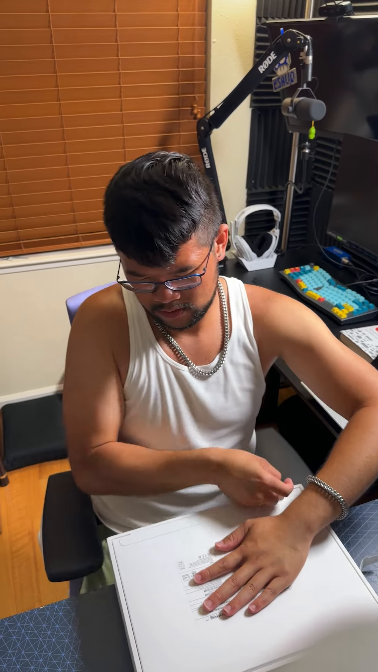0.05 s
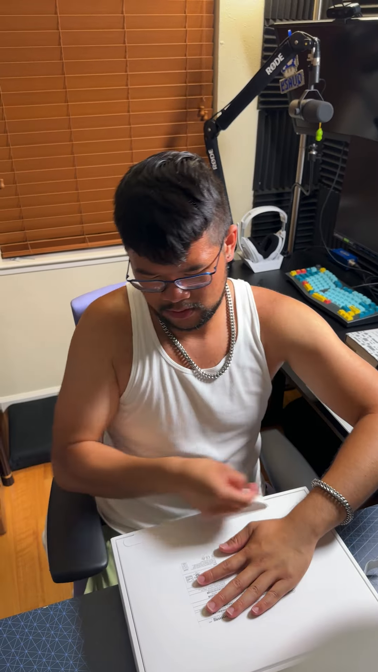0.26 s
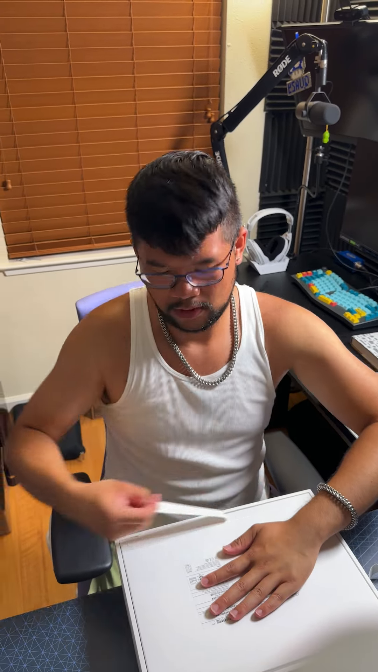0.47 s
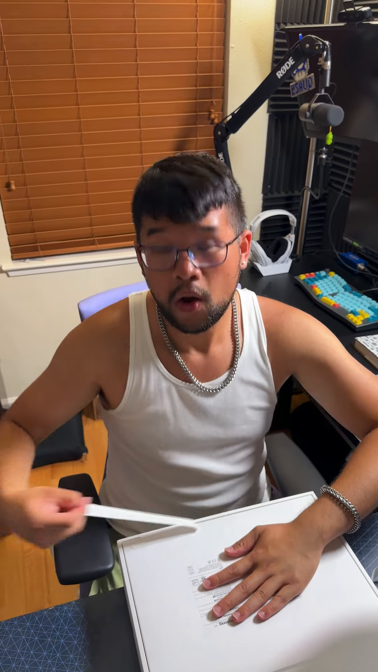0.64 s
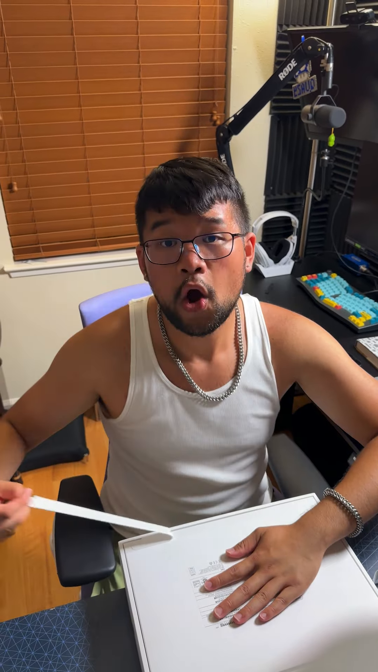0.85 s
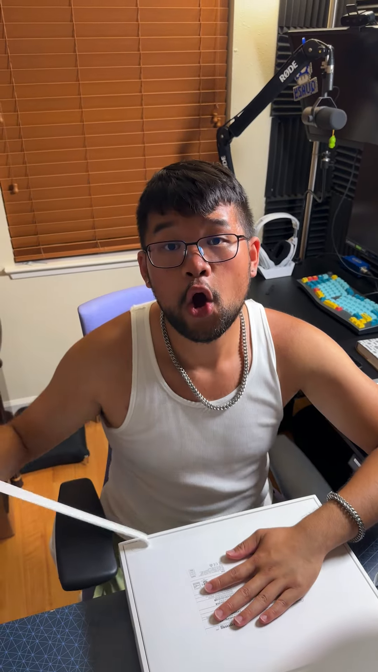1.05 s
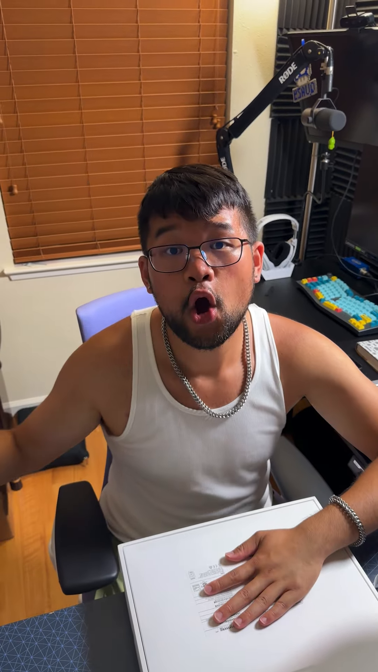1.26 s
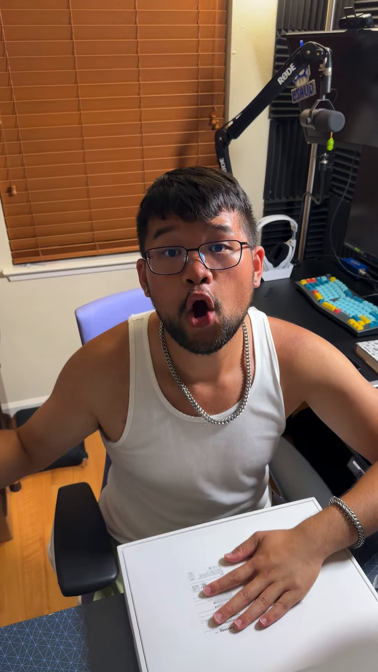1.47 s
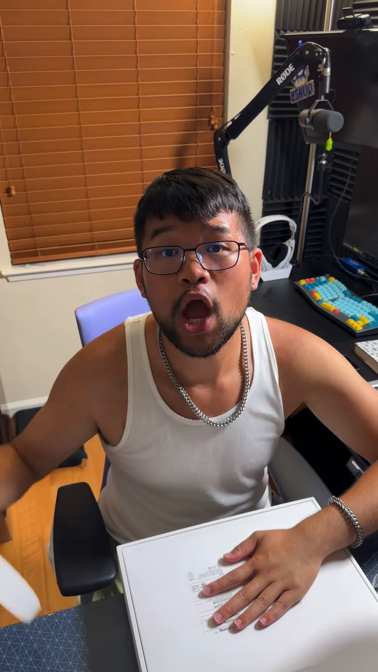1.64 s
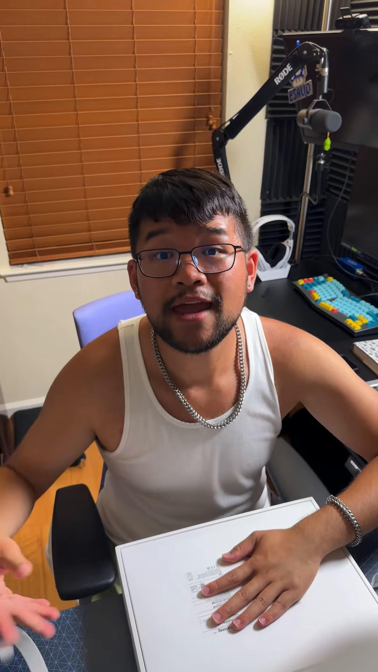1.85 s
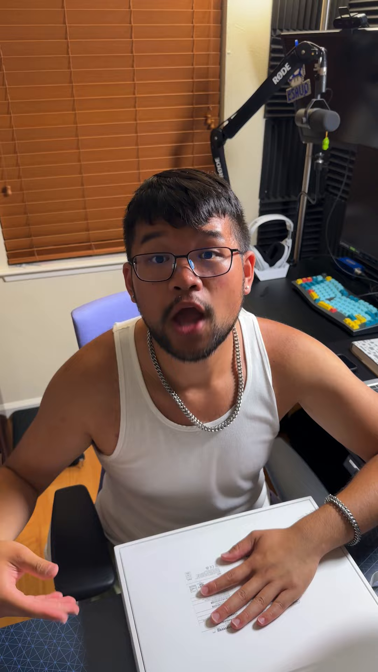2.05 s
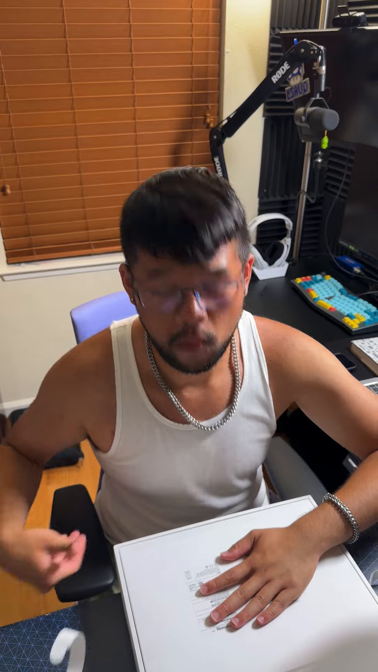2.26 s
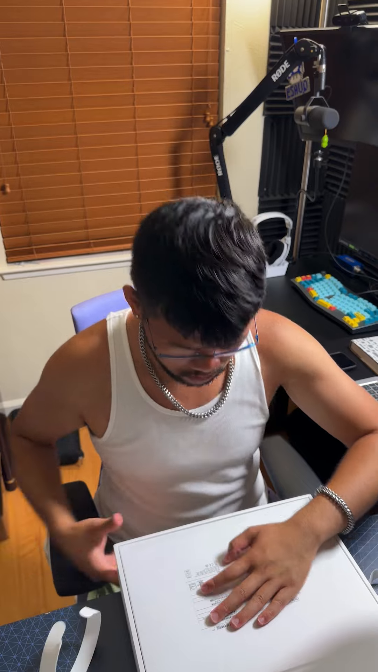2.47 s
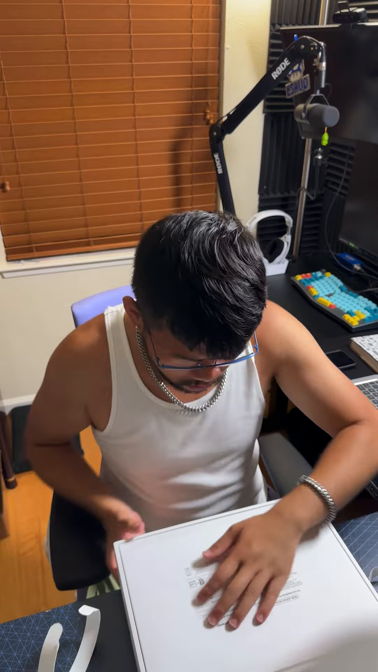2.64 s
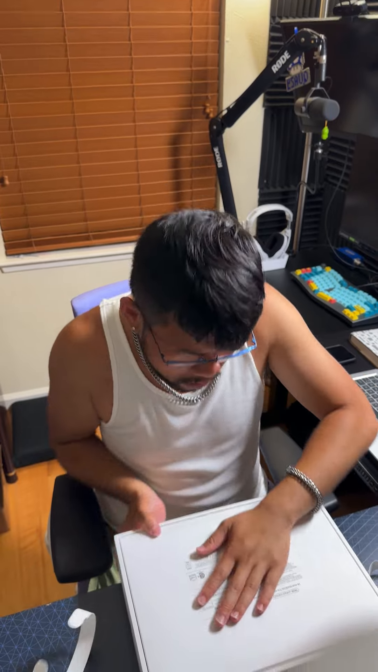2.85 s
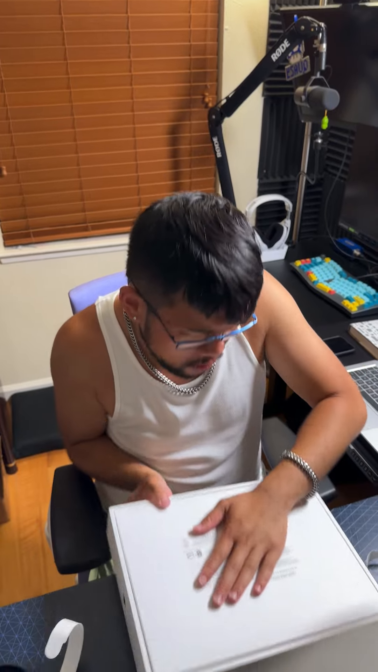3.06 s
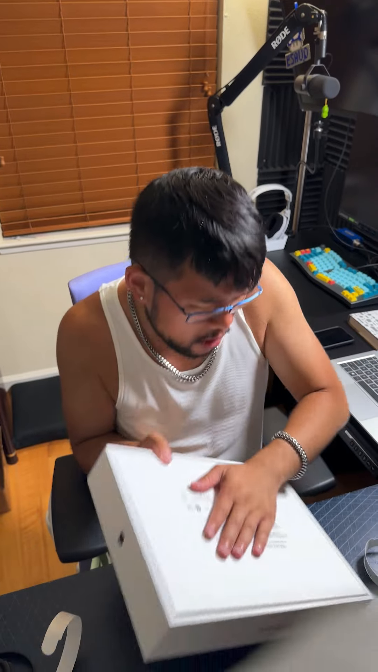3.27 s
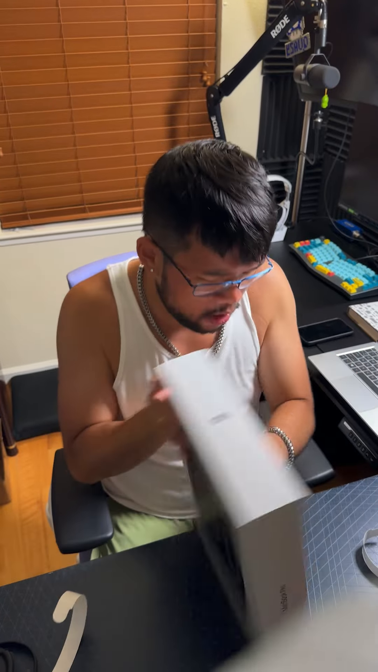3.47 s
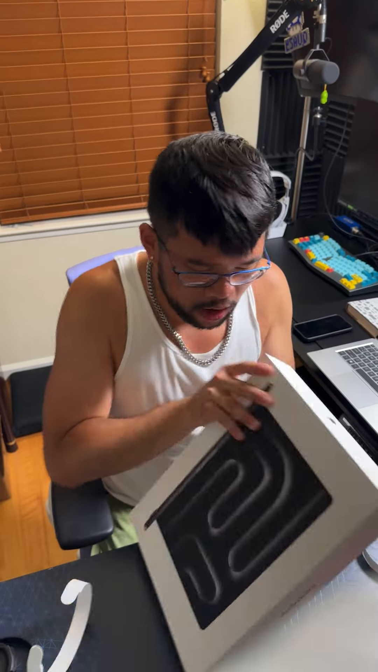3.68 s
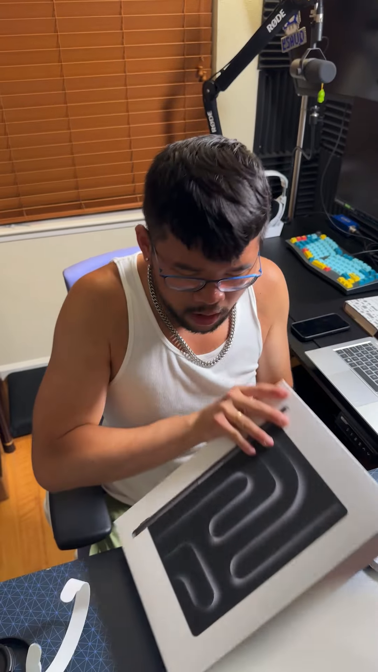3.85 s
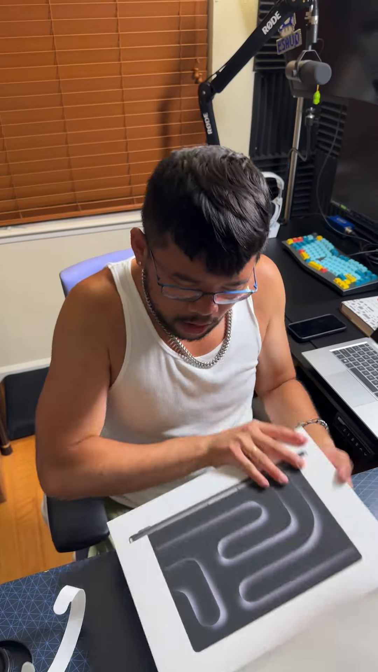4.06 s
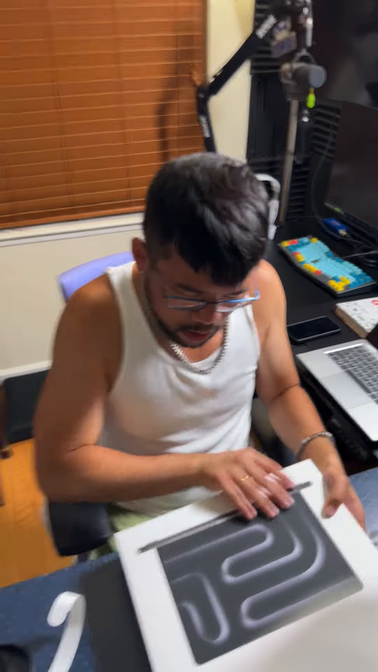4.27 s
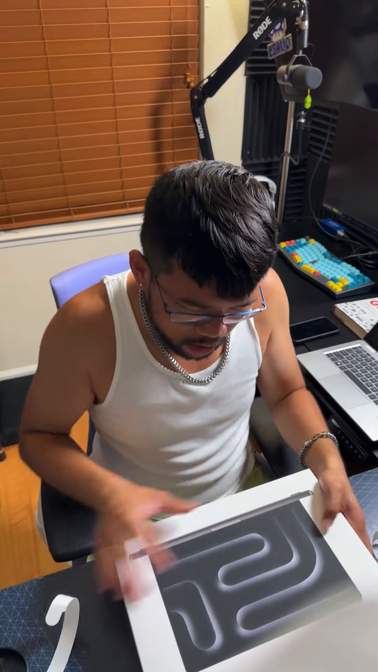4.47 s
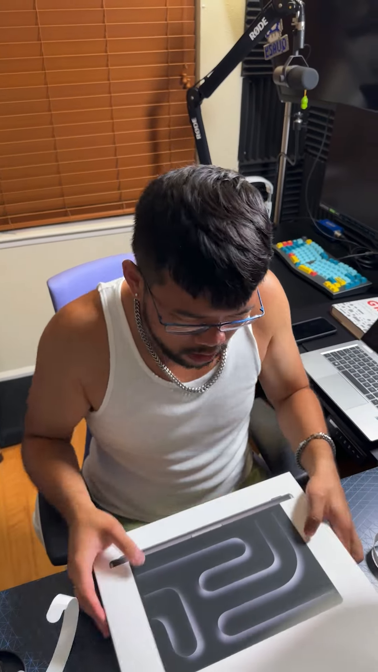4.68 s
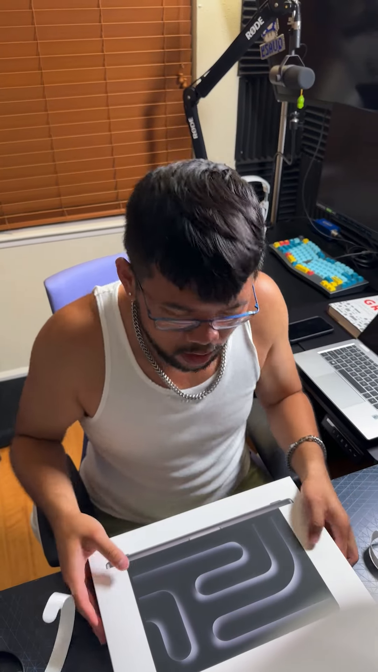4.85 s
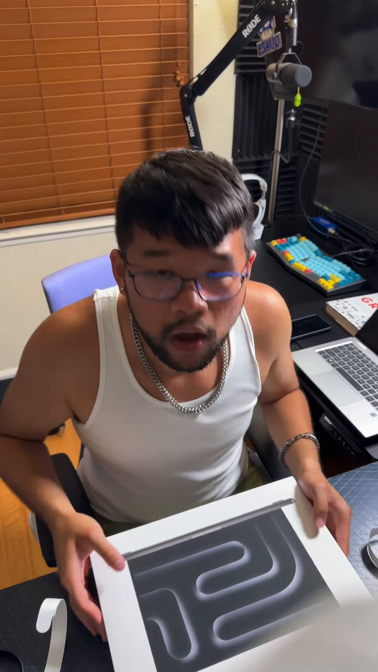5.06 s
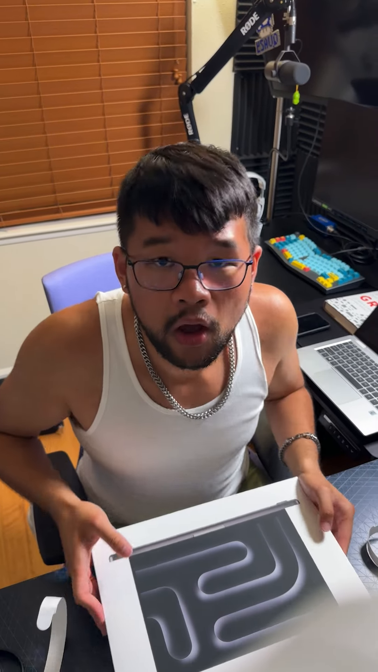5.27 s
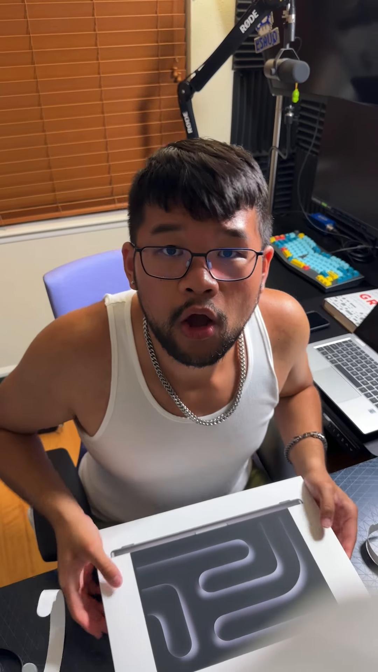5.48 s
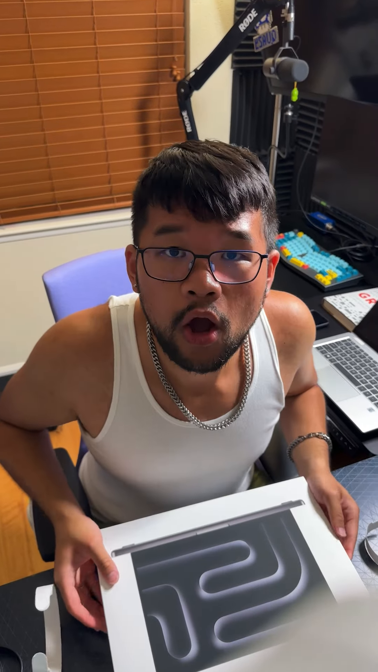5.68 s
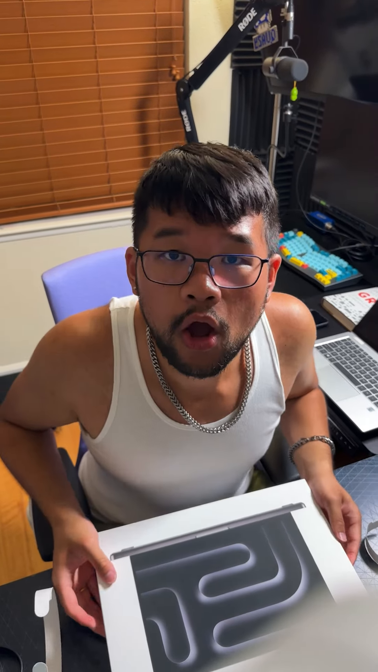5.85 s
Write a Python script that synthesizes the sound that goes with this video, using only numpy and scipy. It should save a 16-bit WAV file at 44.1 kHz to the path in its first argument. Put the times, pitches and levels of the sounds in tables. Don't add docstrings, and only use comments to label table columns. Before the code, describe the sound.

A small, damped room with a steady, faint computer fan, heard close in narrow stereo. From 0 to 1.1 s a paper strip is torn along a cardboard box: dense, dry fibre crackle with small snaps, swelling to about 0.6 s, easing, while the hollow lid drums faintly beneath. At 1.13 s the strip cracks free, sharp and bright, with a short flutter and light thump. Quiet follows, with two crisp crinkles near 1.8 s and skin brushes and nail ticks around 2.5 s. At 3.14 s the box is lifted with a soft knock, scraping through the hands by 3.45 s. Its edge stutters on the desk at 3.57 s with a deep boom; another low thud follows at 3.72 s. At 4.27 s it lands flat, the loudest hollow slap and boom, then settles at 4.63 s. Faint finger brushing, ticks and a soft knock at 5.4 s finish.

```python
import sys
import numpy as np
from scipy import signal
from scipy.fft import rfft, irfft, next_fast_len
from scipy.io import wavfile
from scipy.ndimage import uniform_filter1d, map_coordinates

SR = 44100
rng = np.random.default_rng(int(sys.argv[2]) if len(sys.argv) > 2 else 0)


def store_pcm(level_fs):
    pcm = np.round(np.clip(level_fs, -1, 1) * 32767).astype(np.int16)
    wavfile.write(sys.argv[1], SR, np.atleast_2d(pcm).T)


def volts(x):
    e = np.asarray(x, float) / 20
    return 10 ** e


N = 260975
# t/s, pull level/dB, level of hand pressing on lid/dB, strip resonance f/Hz
PULL = [(0.0, -65, -78, 4240), (0.11, -55, -48, 4350), (0.25, -43, -41.5, 4000), (0.47, -40.5, -47, 3400),
        (0.56, -40, -48, 3700), (0.66, -41.5, -52.5, 5200), (0.76, -46, -56, 3700),
        (0.83, -47.5, -58, 4800), (0.92, -46, -54.5, 4700), (0.97, -47, -48, 3500),
        (1.113, -49, -53.5, 3500)]
# f/Hz, width/Hz, level/dB
DESK_MODES = [(48.34, 7.7, -0.5), (69, 39, -6), (82.1, 13, -3.5)]
# f/Hz, width/Hz, level/dB
BOX_MODES = [(147, 75, -6.5), (205, 43, -4), (240, 16, -0.5), (348.8, 41, -2.5), (491, 90, -10),
             (594, 112, -9.5), (750, 33, -10.5), (914, 53, -14.5)]
REST_DB = np.array([-90, -70])


def unit(x):
    return x / np.sqrt(np.mean(x ** 2) + 1e-20)


def along(points, hz):
    f, v = np.transpose(points)
    return np.interp(np.log(hz + 1), np.log(f + 1), v)


def gains(rows, size=130):
    s, *cols = np.transpose(rows)
    levels = [volts(np.interp(np.arange(N) / SR, s, c, left=-120, right=-120)) for c in cols]
    return uniform_filter1d(levels, size, axis=1)


def filtered(x, response):
    m = next_fast_len(N + SR // 2)
    return irfft(rfft(x, m) * response(np.fft.rfftfreq(m, 1 / SR)), m)[..., :N]


def coloured(x, spectrum):
    return unit(filtered(x, lambda hz: volts(along(spectrum, hz))))


def resonant(x, modes):
    def response(f):
        total = 0
        for k, (centre, width, db) in enumerate(modes):
            damping = 1j * f * width
            total = total + (-1) ** k * volts(db) * damping / (centre ** 2 - f ** 2 + damping)
        return total
    return unit(filtered(x, response))


def add(track, s, sound):
    track[round(s * SR):][:len(sound)] += sound[:N - round(s * SR)]


def grit(rate_hz, depth_db, patchy_db):
    z = signal.stft(rng.standard_normal(N), nperseg=256)[2]
    field = uniform_filter1d(uniform_filter1d(rng.standard_normal(z.shape), 5, 0), 10, 1)
    noise = signal.istft(z * volts(patchy_db * unit(field)), nperseg=256)[1][:N]
    knots = rng.standard_normal(N // 20)
    return noise * volts(depth_db * map_coordinates(knots, [np.arange(N) * rate_hz / SR]))


def crackle(rate_hz, spread_db, t60_s, patchy_db):
    sizes = volts(spread_db * np.minimum(rng.exponential(size=N), 3))
    starts = (rng.random(N) < rate_hz / SR) * sizes
    burst = volts(-60 * np.arange(SR // 20) / SR / t60_s)
    return grit(100, 0, patchy_db) * (1 + signal.fftconvolve(starts, burst)[:N])


def fan():
    # f/Hz, level/dB per Hz
    fan_spectrum = [(20, -12), (45, 2.5), (90, 1.5), (200, -2.5), (400, -11), (750, -8), (1100, -10),
                    (1600, -22.5), (2500, -33), (4500, -31.5), (6200, -31.5), (8000, -48), (12500, -71),
                    (13200, -89.5)]
    return volts(-52) * coloured(grit(7.2, depth_db=0.5, patchy_db=1.0), fan_spectrum)


def room(x):
    # f/Hz, t60/s
    decay = [(150, 0.97), (500, 0.21), (1500, 0.24), (4000, 0.24), (10000, 0.24)]
    hz, t, z = signal.stft(rng.standard_normal(SR // 2), SR, nperseg=256)
    z = z * volts(-60 * t / along(decay, hz)[:, None]) * (hz > 200)[:, None]
    tail = signal.istft(z, SR, nperseg=256)[1]
    return signal.fftconvolve(np.pad(x, (260, 0)), tail / np.linalg.norm(tail))[:N]


def desk():
    # t/s, boom level/dB, upper mode level/dB, t60/s, time until damped/s
    booms = [
        (1.128, -37.5, 1.5, 0.27, 0.19),
        (3.148, -31, 1, 0.27, 0.16),
        (3.455, -23.5, 2.5, 0.26, 0.027),
        (3.571, -12.5, -8, 0.39, 0.093),
        (3.718, -14, -7.5, 0.37, .3),
        (4.271, -10, -3.5, 0.39, .095),
        (4.407, -28.5, -12, .6, 0.12),
        (4.629, -19, -19, 0.23, 0.19),
    ]
    rise_s = 0.0081
    out, t = np.zeros(N), np.arange(SR // 2) / SR
    low, middle, upper = [np.sin(2 * np.pi * hz * t) for hz, *_ in DESK_MODES]
    for s, db, upper_db, t60_s, held_s in booms:
        swing = low + volts(upper_db) * upper
        swing = swing + volts(-2.0 - 60 * t / 0.074) * middle
        damping_db = -60 * t / t60_s - 600 * np.maximum(t - held_s, 0)
        add(out, s, swing * volts(db + damping_db) * (1 - np.exp(-t / rise_s)))
    return out


def knocks():
    # t/s, knock level/dB, struck panel f/Hz, t60/s
    knock_rows = [(1.129, -27, 198, 0.097), (3.137, -21.5, 330, 0.16), (3.559, -19, 336, 0.065),
                  (3.574, -28.5, 205, 0.55), (3.713, -26.5, 376, 0.073), (3.72, -30, 205, 0.2),
                  (3.954, -31.5, 198.4, 0.2), (4.2635, -14, 420, 0.06), (4.2738, -13, 204, 0.093),
                  (4.285, -22.5, 147, 0.4), (4.289, -29, 354, 0.13), (4.622, -36, 397, 0.097),
                  (4.643, -26.5, 266, 0.13), (4.715, -36, 1190, 0.04), (5.8, -50, 270, .15),
                  (5.408, -36.5, 260, 0.11), (3.412, -30.5, 356, 0.42), (3.465, -24.5, 341, 0.13),
                  (4.266, -20.5, 581, 0.099), (4.269, -22.5, 770, 0.095), (4.264, -25, 1250, .04),
                  (4.264, -27, 2200, 0.073), (4.324, -25.5, 240, .06), (3.46, -32, 1470, .06),
                  (3.447, -33, 1860, 0.067), (2, -46, 700, .03), (2, -50, 550, .03), (2.552, -42, 500, .04),
                  (5.415, -42, 400, .08), (3.385, -38, 850, 0.088)]
    out, t = np.zeros(N), np.arange(SR // 2) / SR
    rise = 1 - np.exp(-t / .003)
    for s, db, panel_hz, t60_s in knock_rows:
        others = 0
        for (hz, *_), (a, b) in zip(BOX_MODES, rng.standard_normal((len(BOX_MODES), 2))):
            mode = np.sin(2 * np.pi * hz * (1 + 0.037 * b) * t)
            others = others + volts(a - 9.5 - t * hz * 1.6) * mode
        wander = rng.standard_normal((2, 60))
        rock_db, rock_turn = [map_coordinates(k, [t * 90]) * np.minimum(t / .02, 1) for k in wander]
        panel = volts(3 * rock_db) * np.sin(2 * np.pi * panel_hz * t + 1.2 * rock_turn)
        add(out, s, (panel + others) * volts(db - 60 * t / t60_s) * rise)
    return out


def slaps():
    # t/s, slap level/dB, t60/s
    slap_rows = [(1.128, -30.5, 0.11), (3.137, -28, 0.033), (3.559, -41, 0.1), (3.574, -38, 0.063),
                 (3.711, -38, 0.04), (3.72, -47, 0.081), (3.955, -49, 0.056), (4.263, -13, 0.07),
                 (4.278, -26, .06), (4.274, -19, 0.22), (4.62, -42, 0.068), (4.644, -38, 0.14),
                 (5.227, -60, .1), (5.405, -43, 0.087)]
    # f/Hz, level/dB per Hz
    slap_spectrum = [(200, -1), (450, 1), (1000, -7), (1700, -13), (2700, -21.5), (3600, -35), (6000, -37),
                     (16000, -43.5)]
    # t/s, level/dB, half length/s
    push = (4.2774, -4, .0009)
    gain, air, t = np.zeros(N), np.zeros(N), np.arange(SR // 2) / SR
    for s, db, t60_s in slap_rows:
        add(gain, s, volts(db - 60 * t / t60_s) * (1 - np.exp(-t / 0.00054)))
    push_s, push_db, half_s = push
    add(air, push_s - .005, -volts(push_db) * np.exp(-((t - .005) / half_s) ** 2))
    return air + gain * coloured(grit(300, depth_db=1.5, patchy_db=.8), slap_spectrum)


def strokes(rows):
    scrape_steeper = 1.26
    t, power = np.arange(N // 16 + 1) * 16 / SR, volts(REST_DB)[:, None] ** 2
    for s, hiss_db, scrape_db, rise_s, fall_s in rows:
        below_db = 20 * np.maximum((s - t) / max(rise_s, .003), (t - s) / max(fall_s, .003))
        power = power + volts([hiss_db - below_db, scrape_db - scrape_steeper * below_db]) ** 2
    return uniform_filter1d(np.repeat(np.sqrt(power), 16, axis=1)[:, :N], 64, axis=1)


def hands():
    # peak t/s, hiss level/dB,
    # scrape level/dB, 20 dB rise/s, 20 dB fall/s
    hand_strokes = [(2.08, -79, -62.5, 0.1, .3), (2.53, -66.5, -54, 0.08, 0.24), (2.55, -63, -52, -0.09, 0.13),
                    (2.71, -59.5, -61, 0.03, 0.12), (2.82, -66, -71, 0.24, -0.2),
                    (2.49, -70, -53.5, -0.01, 0.14), (2.945, -60, -72, .1, .13), (2.46, -66, -62, .08, .1),
                    (2.61, -66, -66, .1, .12), (3.05, -69.5, -63, 0.2, .1), (4.8, -68.5, -61.5, .05, 0.25),
                    (5.286, -68, -61, 0.35, 0.1), (5.42, -65.5, -59.5, .04, 0.15), (5.1, -70, -67, 0.3, 0.3),
                    (4.94, -68, -66, .08, .15), (5.22, -68, -63, .15, .15), (5.52, -71, -68, .1, .15),
                    (5.88, -71, -68, .1, .1), (5.62, -73.5, -67, 0.3, 0.5), (5.78, -67, -64, -0.02, -0.04),
                    (3.14, -60.5, -52.5, 0.1, .5), (3.29, -60.5, -47.5, 0.21, 0.52), (3.39, -57, -48, 0.24, 0.2),
              (3.448, -46, -35, 0.025, 0.15), (3.56, -45, -45, 0, 0.0951), (3.463, -46, -33, .02, 0.04),
              (3.494, -44, -33.5, 0.07, 0.05), (3.515, -52, -41.5, .03, 0.03),
              (3.582, -36, -32, 0.0234, 0.04), (3.728, -65, -40.5, .006, 0), (3.894, -61.5, -51, 0.17, .5),
              (4.034, -57, -63, .03, .03), (4.174, -66, -59, -0.2, .5), (4.261, -46, -33.5, -0.0026, .04),
              (4.29, -58.5, -53.5, 0.7, 0.45), (4.493, -53, -54.5, 0, 0.05), (4.623, -56, -52, 0.04, 0.11),
              (4.65, -51.5, -45, 0.08, 0.17)]
    # peak t/s, rustle level/dB, scrape level/dB, 20 dB rise/s, 20 dB fall/s
    rustles = [
        (1.435, -66, -80, .07, .07),
        (1.53, -72, -80, .04, .05),
        (1.71, -72, -80, .04, .06),
        (1.819, -63, -62, .003, .08),
        (1.858, -60, -63, .004, .11),
        (1.99, -70, -75, .01, .05),
    ]
    # t/s, box drumming level/dB, desk shake level/dB
    weight = [(1.2, -52.5, -57.5), (1.53, -66, -57), (1.83, -55.5, -55), (2.14, -67.5, -63),
              (2.5, -52.5, -52), (2.9, -61, -56.5), (3.12, -52.5, -58.5), (3.17, -44.5, -52),
              (3.32, -45.5, -39), (3.44, -36, -48), (3.56, -45, -42), (3.75, -48, -29), (3.83, -45, -39),
              (3.946, -42.5, -36), (4.1, -51, -47), (4.4, -50.5, -52), (4.55, -53.5, -43.5),
              (5.918, -57.5, -70.5)]
    # f/Hz, level/dB per Hz
    skin_spectrum = [(1500, -28), (3000, -4.5), (5000, -1), (7500, 2), (10000, -5), (13000, -4),
                     (16000, -9)]
    # f/Hz, level/dB per Hz
    scrape_spectrum = [(400, -23), (650, 0), (1100, -1), (1600, 3), (2600, -1), (3500, -8.5), (5000, -15.5),
                       (8000, -40)]
    rustle_top_hz = 8800
    hiss, scrape = strokes(hand_strokes)
    rustle, paper_scrape = strokes(rustles) - volts(REST_DB)[:, None]
    scrape = np.hypot(scrape, paper_scrape)
    skin = volts(3) * coloured(grit(200, depth_db=1.2, patchy_db=.8), skin_spectrum)
    paper = filtered(skin, lambda hz: 1 / (1 + (hz / rustle_top_hz) ** 12))
    board = coloured(crackle(500, spread_db=.5, t60_s=0.01, patchy_db=1), scrape_spectrum)
    drum, shake = gains(weight, size=900)
    box = drum * resonant(grit(50, depth_db=2.0, patchy_db=0), BOX_MODES)
    top = shake * resonant(rng.standard_normal(N), DESK_MODES)
    return hiss * skin + rustle * paper + scrape * board + box + top


def snaps(rows, cycles):
    rise_s, ring_db, rasp_db = .0006, -2, -4
    out, t = np.zeros(N), np.arange(SR // 50) / SR
    shape = t / rise_s * np.exp(1 - t / rise_s)
    for s, db, hz in rows:
        rasp = shape * rng.standard_normal(len(t))
        ring = (1 - np.exp(-t / rise_s)) * np.exp(-t * hz / cycles) * np.sin(2 * np.pi * hz * t)
        add(out, s - .0005, volts(db) * (volts(ring_db) * 2 * ring + volts(rasp_db) * rasp))
    return out


def nail_ticks():
    # t/s, peak level/dB, pitch f/Hz, crack level/dB; the one at 1.1383 s is an early echo of the strip's snap
    nail_rows = [(1.342, -56, 2670, 10), (1.818, -33, 5000, 0), (1.8565, -33, 5300, 0),
                 (1.9894, -61, 2310, -4), (2.0692, -45, 3130, -4.5), (2.489, -43, 3000, 2.5),
                 (2.5283, -39, 3020, 7), (2.5518, -33.5, 3020, 7), (2.6815, -44.5, 1850, 4),
                 (3.1357, -41, 2140, -10), (3.26, -45, 2400, 6), (1.1383, -19.5, 6140, -6),
                 (3.7275, -38, 2400, 0), (4.0345, -40, 2800, 0), (4.264, -20, 2000, 0),
                 (4.2792, -26, 2700, -4), (4.619, -35, 2390, 4), (4.6378, -42, 1840, 7),
                 (4.934, -51.5, 3940, 8), (5.2555, -53, 2100, 9), (5.3647, -45, 3400, 7.5),
                 (5.404, -53, 3500, 9), (5.7779, -49.5, 1830, 3)]
    ring_cycles, crack_over_ring = 3.6, 1.4
    out, t = np.zeros(N), np.arange(SR // 5) / SR
    for s, db, hz, crack_db in nail_rows:
        ring = np.sin(2 * np.pi * hz * t) * np.exp(-t * hz / ring_cycles)
        burst = np.sign(rng.standard_normal(len(t))) * volts(-3 - 60 * t / .008)
        pole = np.exp(-2 * np.pi * crack_over_ring * hz / SR)
        crack = unit(signal.lfilter([1], [1, -pole], burst)) * np.std(burst)
        add(out, s, volts(db) * (ring + volts(crack_db) * crack))
    return out


def strip_snap():
    snap_levels = (2, -17, -31)
    # f/Hz, level/dB per Hz
    flutter_spectrum = [(300, -20), (1500, -13), (2500, -8), (3800, -4.5), (5500, 2), (8000, -2),
                        (11000, -1), (16000, 0)]
    free_s = 1.1274
    crack_db, flutter_db, fibres_db = snap_levels
    out, t = np.zeros(N), np.arange(SR // 5) / SR
    add(out, free_s - .013, volts(fibres_db - 60 * t / 0.047) * rng.standard_normal(len(t)))
    partials = [(4600, 1), (1600, 0.4), (5600, 0.45), (3400, .4)]  # f/Hz, gain
    ring = sum(g * np.sin(2 * np.pi * hz * t) for hz, g in partials) * volts(-60 * t / 0.005)
    rasp = volts(-60 * t / 0.0043) * np.diff(rng.standard_normal(len(t) + 1))
    crack = volts(crack_db) * (0.73 * ring + 0.5 * rasp) * (1 - np.exp(-t / 0.00022))
    flutter = coloured(rng.standard_normal(N), flutter_spectrum)[:len(t)]
    add(out, free_s, crack + flutter * volts(flutter_db - 60 * t / 0.17))
    return out


def ticks():
    # t/s, peak level/dB, pitch f/Hz
    paper_rows = [(0.0428, -50, 6800), (0.1052, -40, 4310), (0.1994, -38, 4780), (0.229, -38.5, 2650),
                  (0.2389, -36, 4770), (0.2654, -38, 5950), (0.2834, -38.5, 2830), (0.3054, -36.5, 3770),
                  (0.3465, -36.5, 2650), (0.3646, -33.5, 4710), (0.3834, -35, 4300), (0.4443, -35, 2660),
                  (0.4544, -34, 2600), (0.4806, -36, 2670), (0.5122, -34, 2770), (0.5312, -31.5, 3730),
                  (0.5611, -29.5, 3710), (0.5791, -29.5, 3560), (0.6399, -34.5, 6980), (0.6579, -33, 5680),
                  (0.6779, -34, 3640), (0.6974, -35, 4380), (0.7437, -38, 3580), (0.7864, -40, 3600),
                  (0.7964, -40, 3610), (0.8225, -38.5, 4870), (0.8437, -37, 4610), (0.8564, -34.5, 4710),
                  (0.8884, -32, 4930), (0.9133, -35.5, 4700), (0.9264, -40, 3840), (0.9354, -35, 4710),
                  (0.9597, -32, 3510), (0.9844, -38, 3520), (1.0016, -38.5, 3130), (1.0196, -37, 3530),
                  (1.0326, -35.5, 3420), (1.0445, -41, 3420), (1.0657, -39.5, 3390), (1.0814, -43, 4650)]
    # t/s, peak level/dB, pitch f/Hz
    stutter = [(3.5706, -27, 2700), (3.575, -23, 2600), (3.5775, -17, 2750), (3.582, -25, 3300),
               (3.5855, -24, 2600), (3.5875, -18, 2550), (3.579, -26, 1400), (3.578, -28, 3900),
               (3.5585, -32, 3000), (3.7285, -25, 2700), (3.731, -27, 2680)]
    out = volts(0.8) * snaps(paper_rows, cycles=5) + snaps(stutter, cycles=3.5)
    out = out + nail_ticks() + strip_snap()
    return filtered(out, lambda f: 1 / (1 + 1j * f / 9000) ** 2)


def plucks(spread, cycles, spread_db, count):
    # f/Hz, level/dB
    strip_modes = [(2680, -2.5), (3600, -0.5), (4350, -2.5), (4880, 0.5), (5900, -2.5), (7000, -2.5)]
    s, pitch_hz = np.transpose(PULL)[[0, 3]]
    start, t = rng.random((count, 1)) * s[-1], np.arange(SR // 100) / SR
    modes_hz, mode_db = np.transpose(strip_modes)
    aim_hz = np.interp(start, s, pitch_hz) * np.exp(spread * rng.standard_normal((count, 1)))
    near = np.abs(np.log(aim_hz / modes_hz)).argmin(axis=1)[:, None]
    hz = modes_hz[near] * np.exp(.025 * rng.standard_normal((count, 1)))
    level = volts(mode_db[near] + spread_db * rng.standard_normal((count, 1)))
    rings = level * np.sin(2 * np.pi * hz * t) * np.exp(-t * hz / cycles)
    out = np.bincount(((start + t) * SR).astype(int).ravel(), rings.ravel(), N)
    return out / np.sqrt(np.sum(out ** 2) / (s[-1] * SR))


def tear():
    # f/Hz, level/dB per Hz
    fibre_spectrum = [(500, -61), (700, -3), (1600, -6.5), (2600, -2.5), (3600, -8), (4700, -2.5),
                      (6000, -1), (8500, -1), (12000, 4.5), (14000, -0.5), (16000, -18)]
    # f/Hz, width/Hz, level/dB
    lid_modes = [(180, 55, -1.5), (274, 50, 2.5), (356, 59, 0), (410, 44, -1)]
    rip, drum = gains(np.array(PULL)[:, :3])
    shake = drum * volts(1) + rip * volts(-1)
    fibres = volts(2) * coloured(crackle(800, spread_db=2.4, t60_s=.006, patchy_db=2), fibre_spectrum)
    fibres = fibres + volts(-11) * plucks(spread=.25, cycles=8, spread_db=3.5, count=700)
    lid = resonant(grit(60, depth_db=1.0, patchy_db=0.0), lid_modes)
    top = resonant(rng.standard_normal(N), [(64, 8.3, 0)])
    return rip * fibres + drum * lid + shake * top


def ports(mono):
    # f/Hz, level/dB
    diffuse = [(150, -29), (380, -17.5), (700, -9.5), (1200, -12), (1800, -30), (5000, -40), (8000, -19),
               (11500, -13.5), (15000, -19.5)]
    lag_s = 42.5e-6
    t = np.arange(SR // 8) / SR
    scatter = rng.standard_normal((2, len(t))) * volts(-60 * t / .12)
    scatter = scatter / np.linalg.norm(scatter[0])
    scattered = signal.fftconvolve(mono[None], scatter, axes=1)[:, :N]
    common, unlike = filtered(scattered, lambda hz: volts(along(diffuse, hz)) * [hz > 3000, hz > 0])
    sides = np.array([[1], [-1]])
    direct = filtered(np.array([mono, mono]), lambda hz: np.exp(-1j * np.pi * hz * lag_s * sides))
    return direct + common - unlike * sides


def scene():
    near = desk() + knocks() + slaps() + hands() + ticks() + tear()
    return ports(near + volts(-9.5) * room(near) + fan())


def gated(x):
    top_hz, gate_db, gate_s = np.array([[9800], [12700]]), -84, .023
    top = filtered(x, lambda hz: hz > top_hz)
    level = np.sqrt(np.abs(uniform_filter1d(top ** 2, round(gate_s * SR), axis=1)))
    return x - top / (1 + (level / volts(gate_db)) ** 8)


def roll_off(x):
    return signal.sosfilt(signal.butter(12, 16800, fs=SR, output="sos"), x)


def record(dry):
    # f/Hz, level/dB
    mid_kept = [(20, -15.5), (38, -0.5), (10300, 0.5), (10900, -18), (13400, -23), (14000, 3.5), (15900, 6),
                (16050, -88.5)]
    # f/Hz, level/dB
    side_kept = [(120, -17.5), (250, 2), (1400, 1.5), (1550, -28.5), (5900, -30.5), (6250, -5.5),
                 (9000, -4), (11000, -3), (15900, 0.5), (16050, -94)]
    both = np.array([dry[0] + dry[1], dry[0] - dry[1]]) / 2
    both = filtered(both, lambda hz: volts([along(mid_kept, hz), along(side_kept, hz)]))
    mid, side = gated(both)
    return roll_off(np.array([mid + side, mid - side]))


dry = scene()
out = record(dry)
store_pcm(out)
```